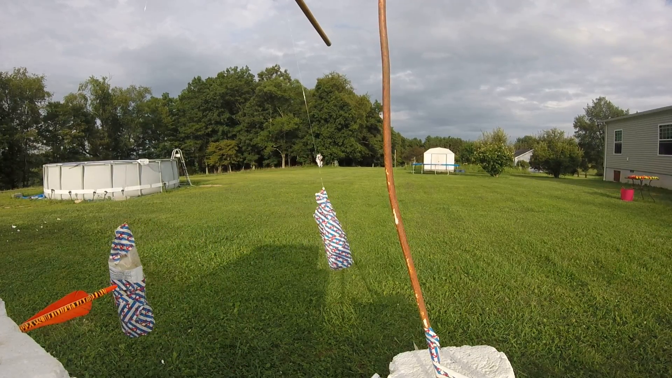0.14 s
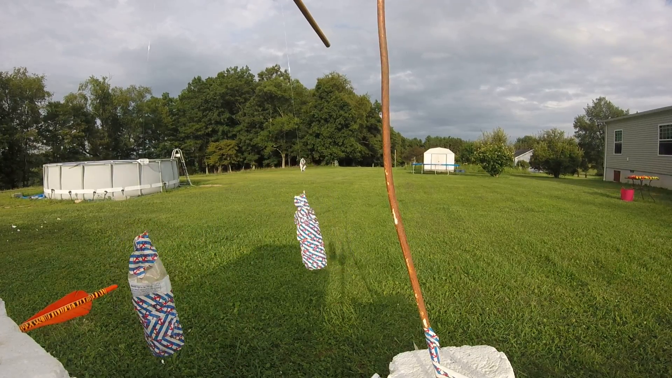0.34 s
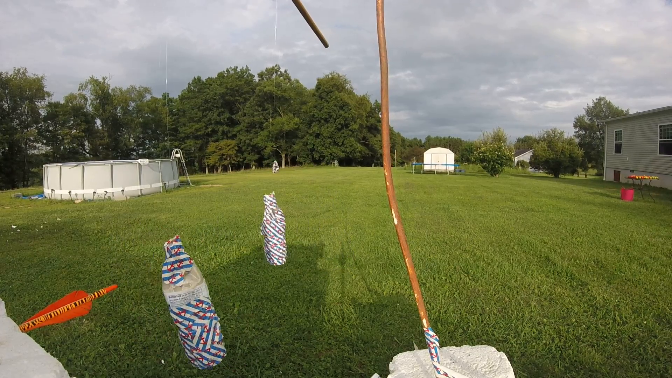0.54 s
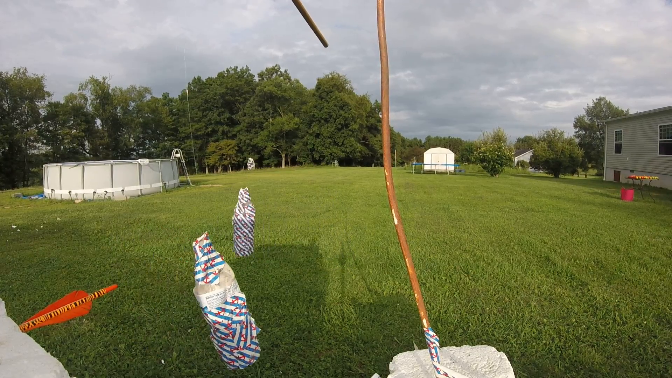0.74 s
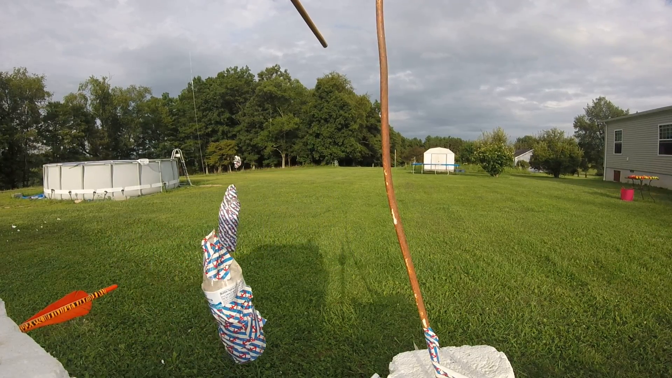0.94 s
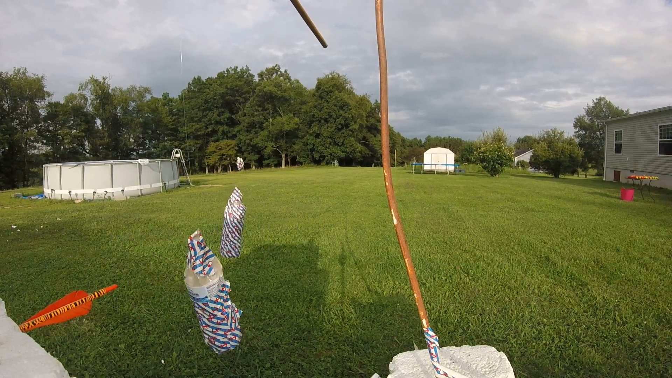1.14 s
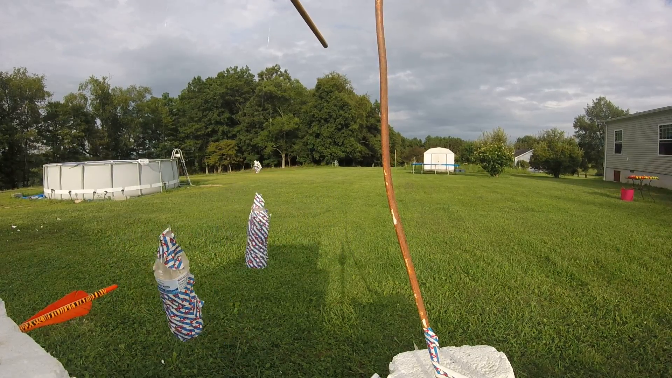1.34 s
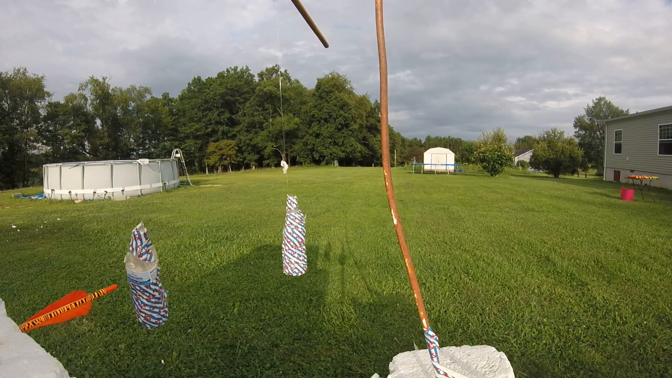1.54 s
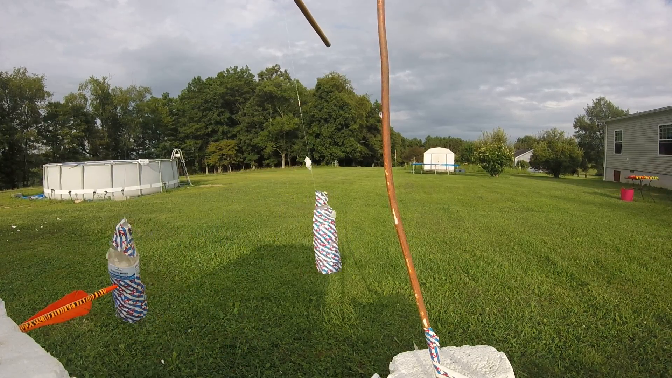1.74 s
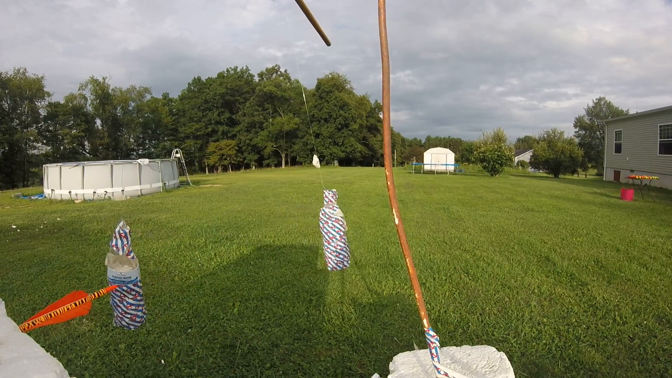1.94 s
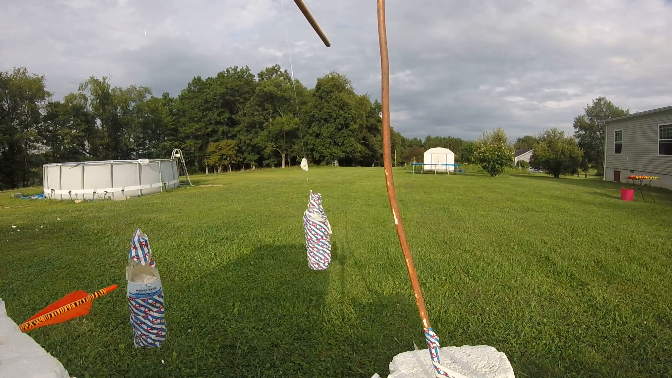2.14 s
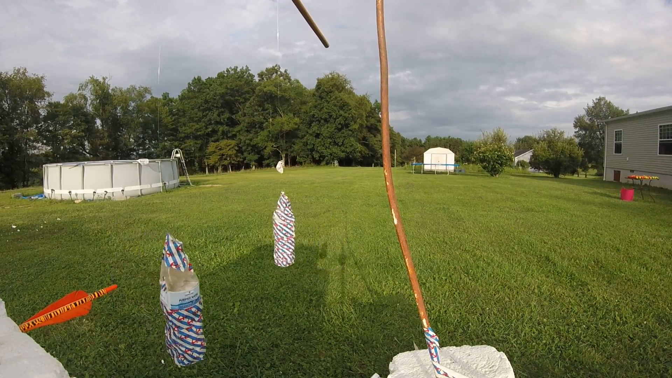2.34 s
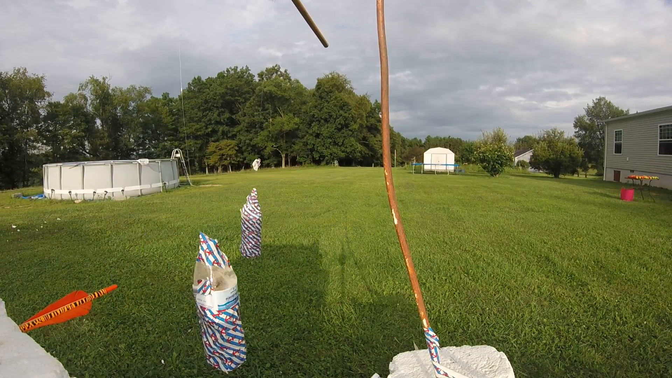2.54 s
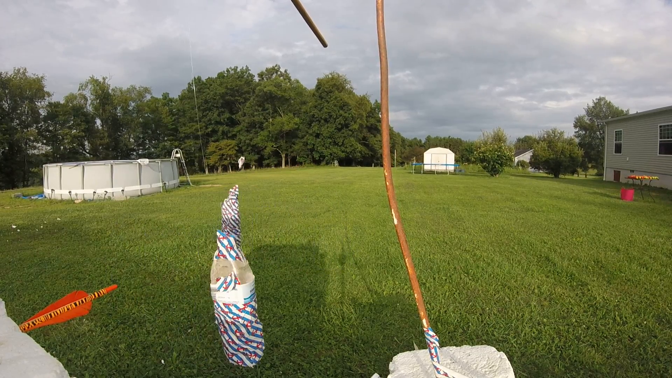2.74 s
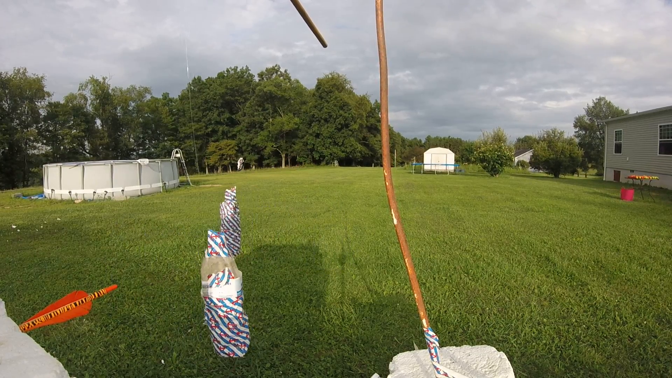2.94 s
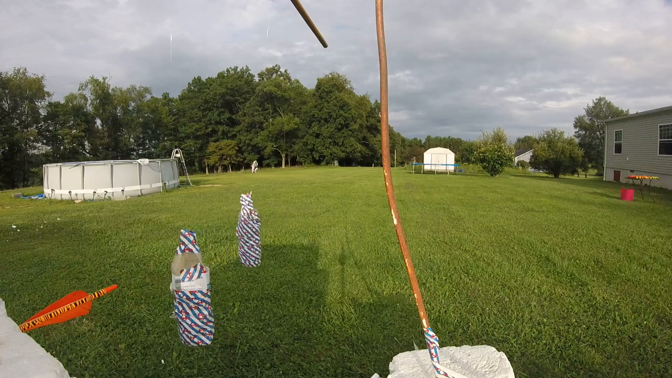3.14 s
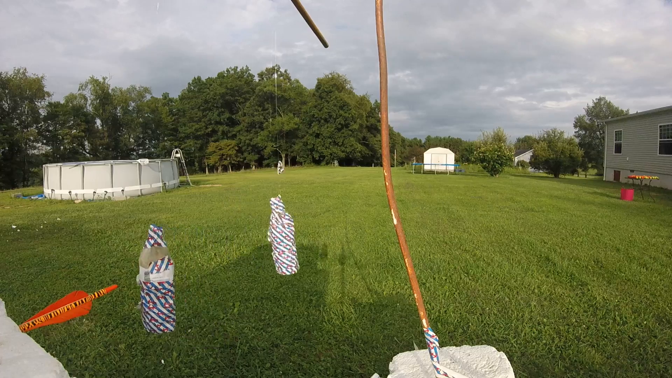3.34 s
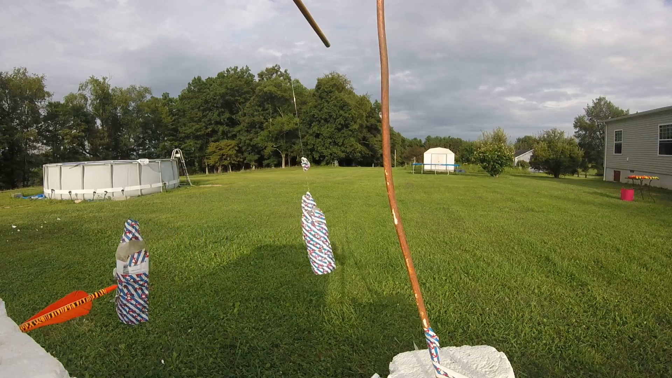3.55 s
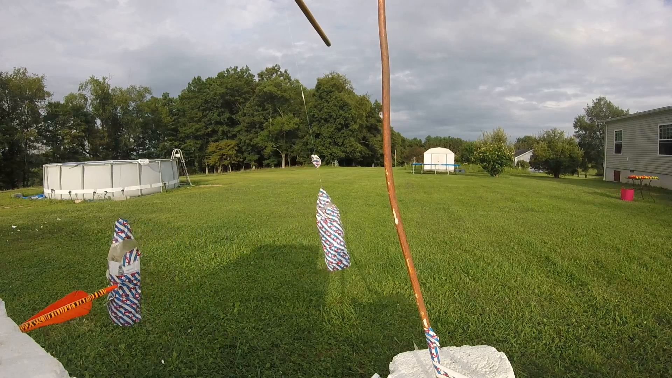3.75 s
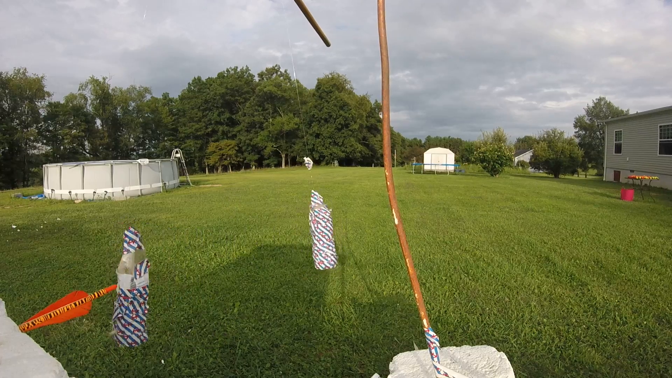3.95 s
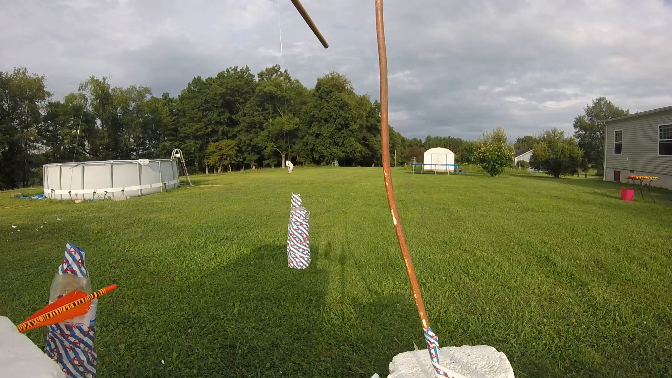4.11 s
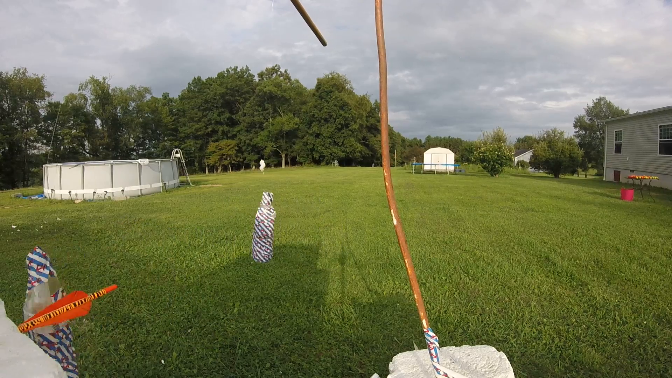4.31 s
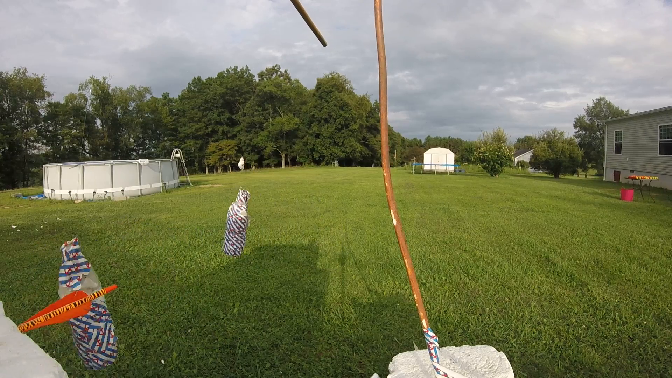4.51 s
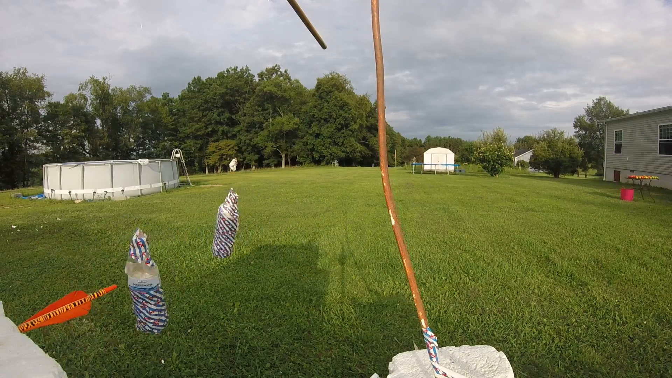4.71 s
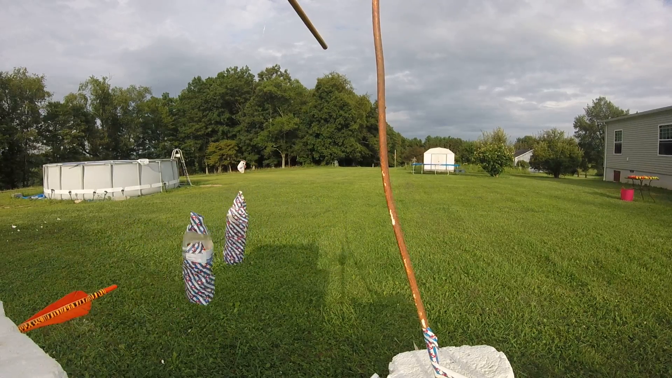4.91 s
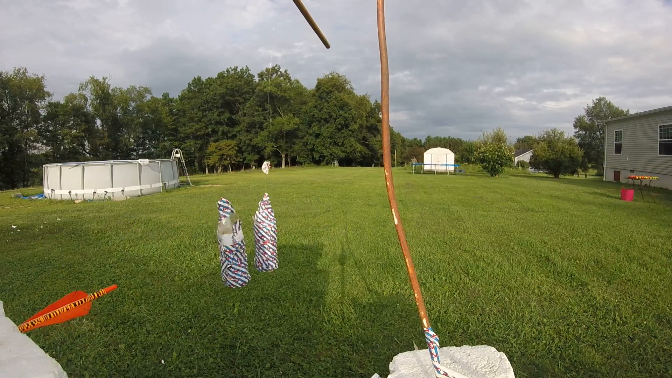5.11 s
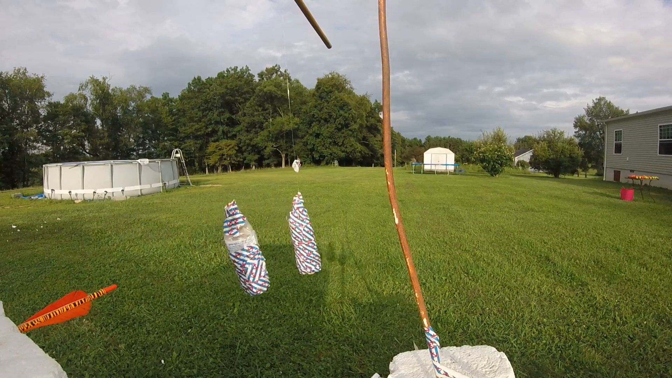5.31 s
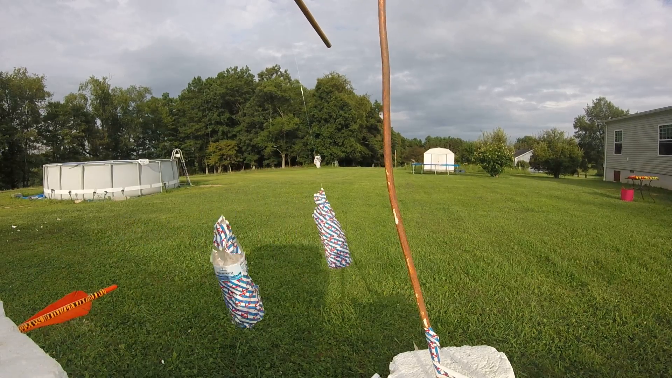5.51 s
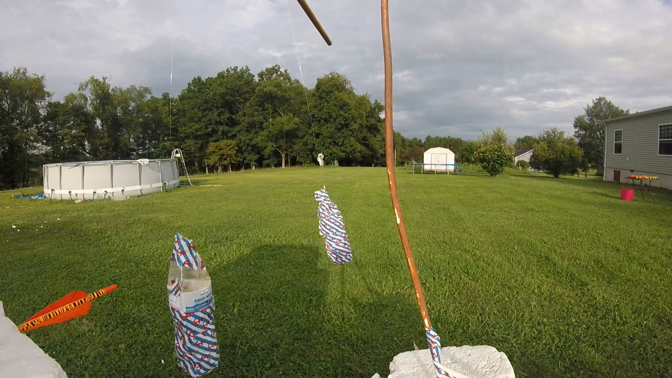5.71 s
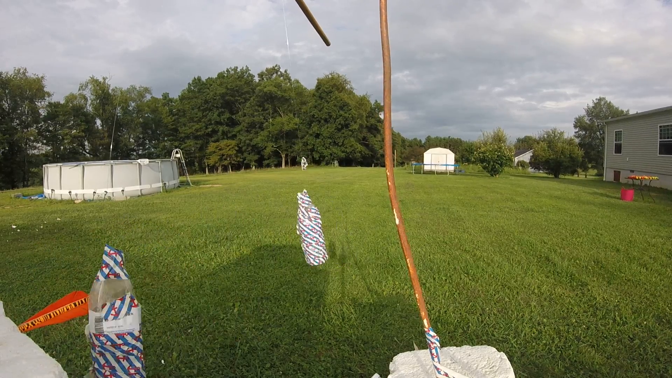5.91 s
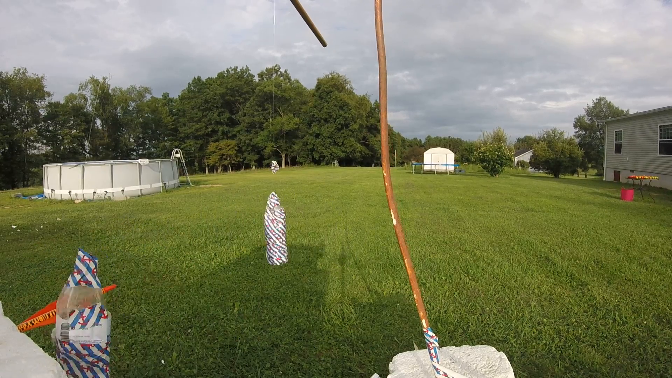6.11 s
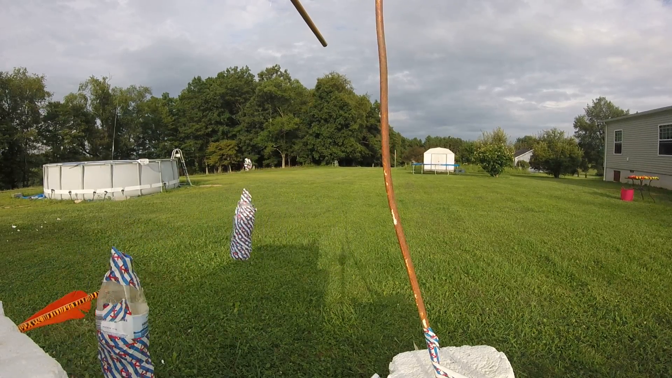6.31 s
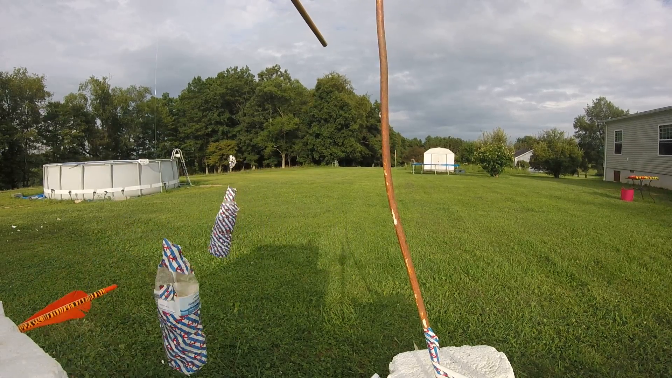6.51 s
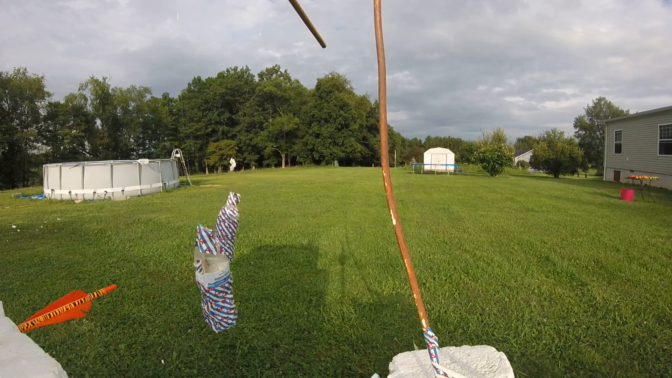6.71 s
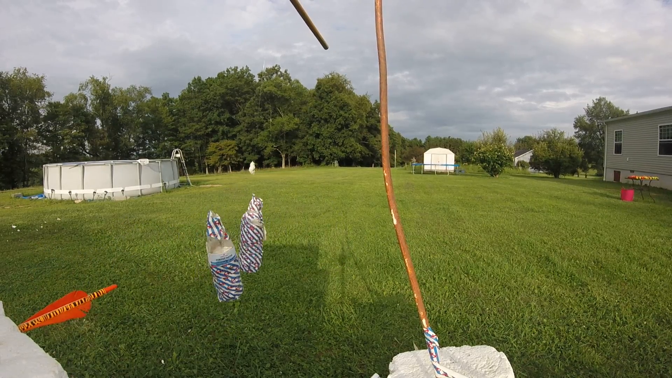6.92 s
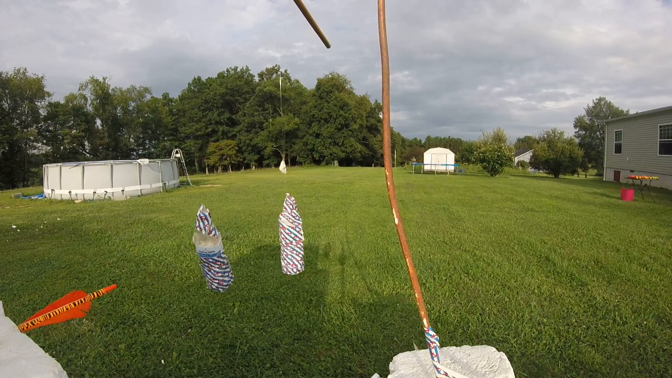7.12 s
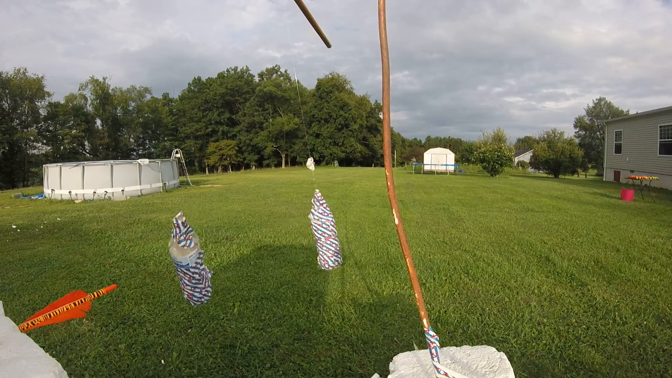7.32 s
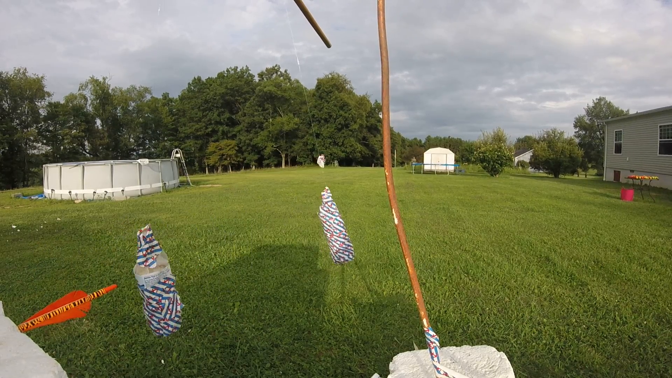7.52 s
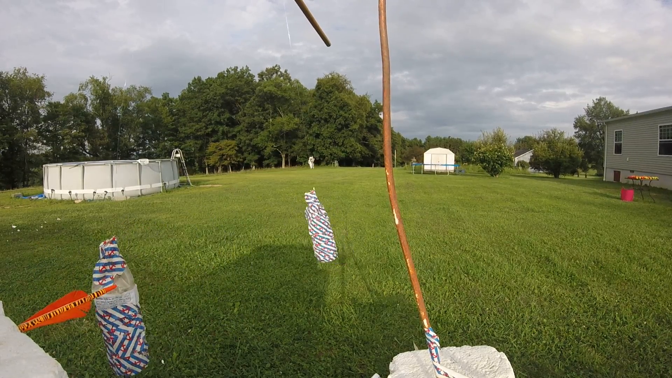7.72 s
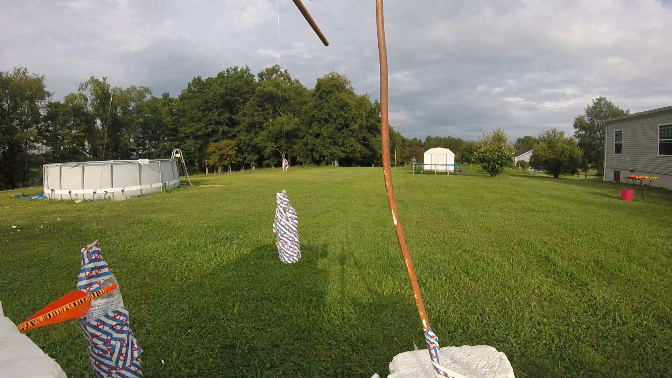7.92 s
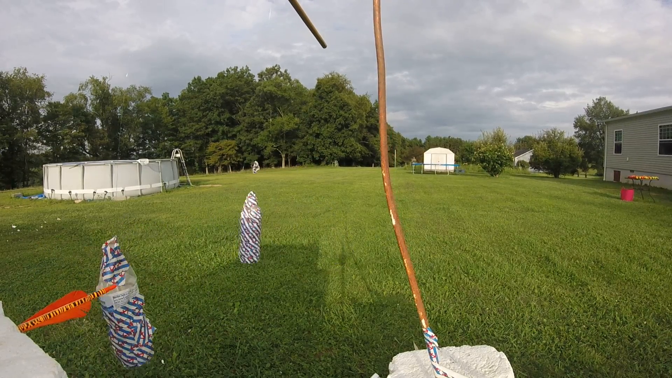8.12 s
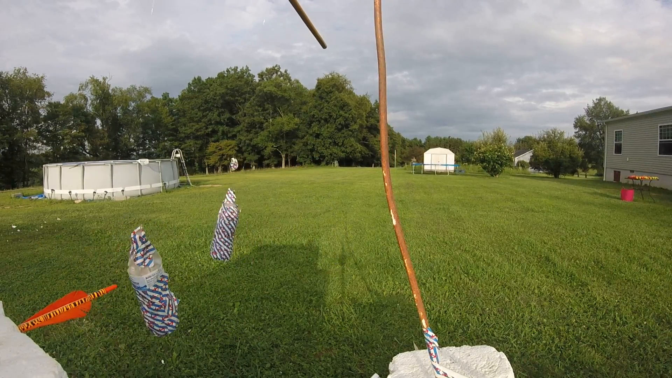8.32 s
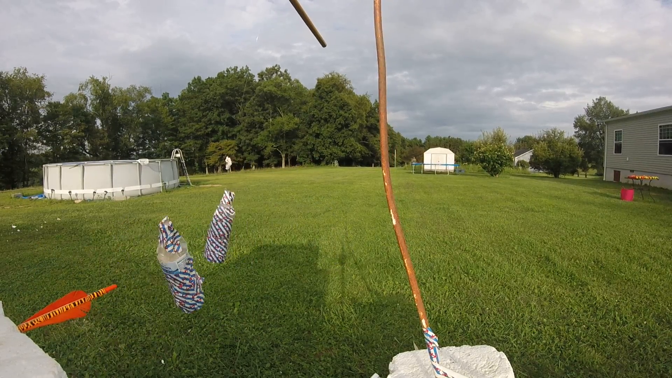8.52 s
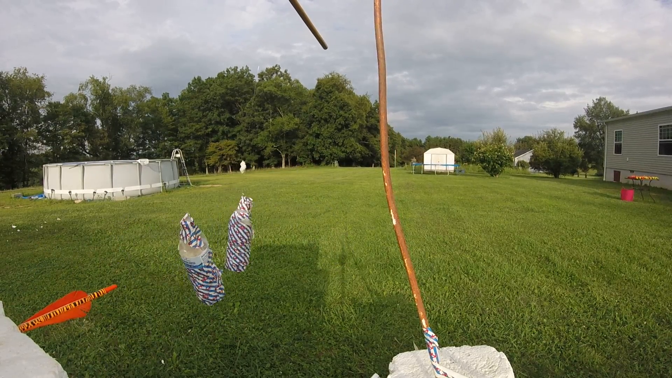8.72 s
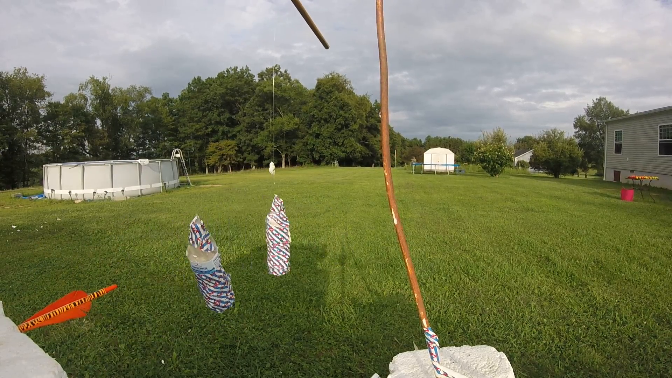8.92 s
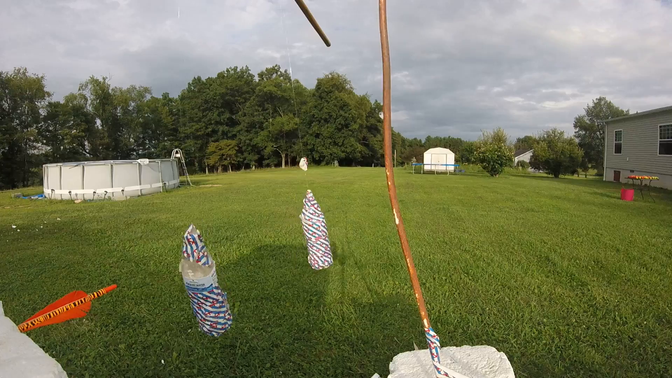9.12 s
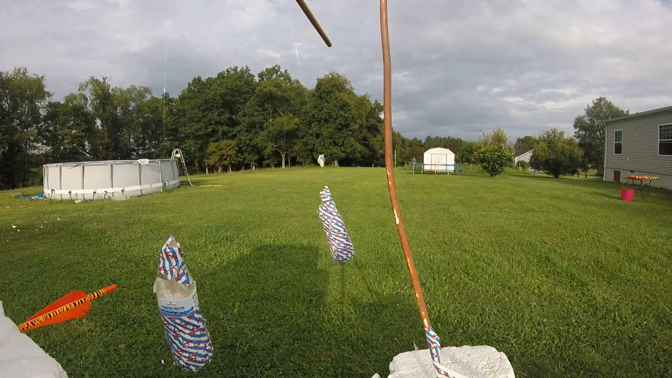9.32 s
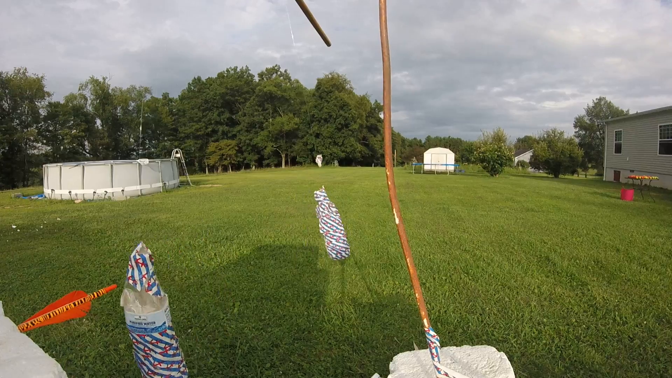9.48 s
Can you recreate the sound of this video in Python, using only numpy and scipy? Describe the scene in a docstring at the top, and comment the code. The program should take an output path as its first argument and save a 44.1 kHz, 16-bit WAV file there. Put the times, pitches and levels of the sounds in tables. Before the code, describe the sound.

An arrow cracks into a nearby target and rattles, then swinging bottles knock against its shaft over faint insects and a distant engine.

```python
"""An arrow strikes a back-yard target.

A far bow slaps, feathers hiss closer, and the arrow cracks into a target beside the microphone,
exciting its damped modes. The shaft rattles; later, bottles swinging on strings brush and knock it.
House and trees reflect each blow. Insects chirp, a distant engine drones and light wind buffets."""
import sys
import numpy as np
from scipy import signal
from scipy.fft import rfft, irfft, next_fast_len
from scipy.io import wavfile
from scipy.ndimage import minimum_filter1d, map_coordinates

SR = 44100
rng = np.random.default_rng(int(sys.argv[2]) if len(sys.argv) > 2 else 0)


def unload_audio(sound):
    """Save the sound as a 16-bit wav file, at the path given as the first command line argument."""
    columns = np.transpose(np.atleast_2d(sound))
    # keep every value between -1 and 1, then stretch to whole-number steps
    steps = np.round(np.clip(columns, -1, 1) * 32767)
    wavfile.write(sys.argv[1], SR, steps.astype(np.int16))


N = 421155


def amp(db):
    """The decibel scale: 20 dB is a tenfold amplitude."""
    return 10 ** (np.asarray(db) / 20)


def unit(x):
    """Normalisation to rms 1."""
    return x / np.sqrt(np.mean(x ** 2) + 1e-20)


def along(spectrum, hz):
    """Interpolation of a spectrum on a logarithmic frequency axis."""
    knots_hz, level_db = np.transpose(spectrum)
    return np.interp(np.log(hz + 1), np.log(knots_hz + 1), level_db)


def curves(rows):
    """Linear interpolation in time: one curve for each column after the first."""
    times, *columns = np.transpose(rows)
    return [np.interp(np.arange(N) / SR, times, column) for column in columns]


def wobble(rate_hz):
    """Random modulation: a smooth curve through Gaussian knots."""
    knots = rng.standard_normal(int(N * rate_hz / SR) + 4)
    return map_coordinates(knots, [np.arange(N) * rate_hz / SR])


def noise(spectrum, size=N):
    """Spectral shaping of white noise, at rms 1."""
    padded = next_fast_len(size + 8192)
    gain = amp(along(spectrum, np.fft.rfftfreq(padded, 1 / SR)))
    return unit(irfft(rfft(rng.standard_normal(padded)) * gain, padded)[:size])


def envelope(start, end, rise_db_per_s, fall_db_per_s, size=N):
    """Exponential growth until start, a hold at 1, and exponential decay after end."""
    t = np.arange(size) / SR
    return amp(-rise_db_per_s * np.maximum(start - t, 0) - fall_db_per_s * np.maximum(t - end, 0))


def minimum_phase(gain_db):
    """Folding the cepstrum gives the promptest impulse response with this spectrum."""
    cepstrum = irfft(np.log(amp(gain_db)))
    half = len(cepstrum) // 2
    cepstrum[1:half] *= 2
    cepstrum[half + 1:] = 0
    return irfft(np.exp(rfft(cepstrum)))


def add(track, start_s, sound):
    """Superposition of a sound on the track."""
    span = track[max(round(start_s * SR), 0):][:len(sound)]
    span += sound[:len(span)]


# Puffs of wind: peak_s, half_length_s, level_db
WIND_PUFFS = [(1.83, .1, -46), (2.9, 1.3, -56), (4.903, .08, -47), (7.033, 0.071, -37.5),
              (7.319, 0.17, -36.5), (7.792, 0.074, -38), (8.253, 0.49, -47.5), (8.998, 0.053, -42),
              (9.41, 0.094, -41)]
# Spectra of the buffeting and of the outdoor hush: frequency_hz, density_db
BUFFET_SPECTRUM = [(12, -35), (32, 1.5), (90, 0), (140, -5), (220, -16.5), (400, -32.5), (1200, -68.5)]
HUSH_SPECTRUM = [(12, -16), (22, -5.5), (110, -2.5), (180, -8), (230, -14), (450, -17.5), (760, -16.5),
                 (1020, -22), (1500, -25.5), (2300, -26.5), (2800, -31), (4000, -33.5), (5500, -33.5),
                 (7000, -34), (8000, -42), (11000, -48.5), (15500, -56)]

def wind(calm_db=-61, hush_db=-49.5):
    """Turbulent pressure buffets the microphone in bell-shaped puffs over a steady hush."""
    t = np.arange(N) / SR
    puffs = sum(amp(db) * np.exp(-((t - peak) / half) ** 2) for peak, half, db in WIND_PUFFS)
    buffet = (amp(calm_db) + puffs) * amp(2.0 * wobble(22)) * noise(BUFFET_SPECTRUM)
    hush = amp(hush_db + 0.22 * wobble(4.1)) * noise(HUSH_SPECTRUM)
    return buffet + hush


# Exhaust partials: firing_multiple, level_db
ENGINE_ORDERS = [(1, 3.5), (1.4, -13), (2, -20.5), (2.4, -16.5), (3, -23), (5, -31), (6, -36)]

def drone(spell, overtones_db, drift_hz=0.4, fade_db_per_s=216):
    """Periodic firing gives harmonics; uneven firing adds orders between the whole ones."""
    firing_hz, level_db = curves(spell)
    phase = 2 * np.pi * np.cumsum(firing_hz + drift_hz * wobble(10)) / SR
    tone = np.zeros(N)
    for order, db in ENGINE_ORDERS:
        waver_db = np.sqrt(order) * wobble(40)
        tone += amp(db + overtones_db * (order > 1) + waver_db) * np.sin(order * phase)
    fade = envelope(spell[0][0], spell[-1][0], fade_db_per_s, fade_db_per_s)
    return amp(level_db) * fade * unit(tone)


# Spells of droning (LATE_SPELLS holds two): time_s, firing_hz, level_db
OPENING_SPELL = [(0, 126.2, -38.5), (.09, 124.8, -42)]
EASING_SPELL = [(0.38, 123.0, -38.5), (0.45, 122.8, -39.5), (0.886, 121.0, -37.5), (1.418, 118.9, -32),
                (1.534, 118.4, -34.5), (1.806, 116, -31.5), (1.912, 113.5, -38), (2.08, 109.8, -38.5),
                (2.1, 109.6, -46)]
LATE_SPELLS = [
    [(2.7, 159.3, -48.5), (3.274, 143.1, -59), (3.368, 155.5, -55.5), (4.0, 153.0, -52)],
    [(8.0, 117.4, -39.5), (8.25, 119.8, -38.5), (8.876, 141.1, -47.5), (9.55, 144.8, -52)],
]
# Course of the exhaust roar: time_s, level_db
ROAR_COURSE = [(0, -44), (.35, -42), (1.5, -42), (3, -53.5), (3.8, -52.5), (4.4, -63.5), (7.8, -60),
               (8.1, -51), (9.55, -56)]
# Spectrum of the roar: frequency_hz, density_db
ROAR_SPECTRUM = [(30, -3.5), (80, -7), (160, 1.5), (210, -7), (300, -7), (430, -21.5), (680, -12.5),
                 (1000, -29.5), (2200, -31), (5000, -66)]

def engine():
    """Tonal plus broadband exhaust noise: a far engine eases off, then picks up again, duller."""
    early = sum(drone(spell, overtones_db=0.5) for spell in [OPENING_SPELL, EASING_SPELL])
    late = sum(drone(spell, overtones_db=-7.5) for spell in LATE_SPELLS)
    roar_db, = curves(ROAR_COURSE)
    roar = amp(roar_db + 1.3 * wobble(7.4)) * noise(ROAR_SPECTRUM)
    return early + late + roar


# Insect songs: start_s, end_s, chirp_rate_hz, top_hz, end_hz, level_db
INSECT_SONGS = [(0, 2.38, 15, 7020, 6600, -70), (2.42, 3.6, 13.3, 6800, 6450, -76),
                (3.62, 7.6, 13.7, 6970, 6566, -70), (7.4, 7.2, 10, 6450, 6100, -73.5),
                (8.3, 9.55, 15, 6900, 6580, -74), (0, 8.45, 16, 6373, 6237, -75.5)]

def insects(duty=0.61, crest=0.095, rasp=0.34, scatter_db=1.5):
    """Stridulation: each wing stroke is a raspy chirp whose pitch crests early, then falls."""
    t, out = np.arange(N) / SR, np.zeros(N)
    for start, end, rate_hz, top_hz, end_hz, db in INSECT_SONGS:
        cycles = (t - start) * rate_hz + 0.057 * wobble(1.8)
        stroke = np.minimum(cycles % 1 / duty, 1)
        fall = ((stroke - crest) / (1 - crest)) ** 2
        pitch_hz = top_hz + (end_hz - top_hz) * (fall + rasp * wobble(900))
        tone = unit(np.sin(2 * np.pi * np.cumsum(pitch_hz) / SR))
        swell = unit(np.sqrt(np.abs(np.sin(np.pi * stroke)))) * (t > start) * (t < end)
        out += amp(db + scatter_db * wobble(17)) * swell * tone
    return out


# Reflections from lawn, house wall and trees: delay_s, relative_db, fall_db_per_s
REFLECTIONS = [(0.0046, 17.5, 400), (.078, 3, 350), (0.027, 7.5, 52.5)]
# Spectrum of the reflections: frequency_hz, density_db
ECHO_SPECTRUM = [(80, -19.5), (300, 2), (800, -8.5), (1400, -10.5), (2200, 1.5), (4000, -4.5), (6800, -1),
                 (10000, -2), (15000, -3.5)]

def yard_echo(source, echo_db, lumps_db=4.0, size=30000):
    """Diffuse reflection: convolution with a noise tail that swells at each surface's delay."""
    fade = sum(amp(db) * envelope(delay, delay, rise_db_per_s=601, fall_db_per_s=fall, size=size)
               for delay, db, fall in REFLECTIONS)
    tail = noise(ECHO_SPECTRUM, size) * fade * amp(lumps_db * wobble(90))[:size]
    return amp(echo_db) * signal.fftconvolve(source, tail / np.linalg.norm(tail))[:N]


def flight(peak_s=4.05, level_db=-59):
    """Aerodynamic noise: the hiss of the feathers grows as the arrow nears."""
    hiss = noise([(300, -7.0), (2000, 11), (3000, -8), (8000, -11.5), (9800, -9.0), (14000, -25)])
    return amp(level_db) * envelope(peak_s, peak_s, rise_db_per_s=55, fall_db_per_s=107) * hiss


# Spectrum of the bow's slap: frequency_hz, density_db
BOW_SPECTRUM = [(200, -7), (700, 5), (1300, -13), (2100, 4), (2700, -11.5), (3900, -12), (7000, -20),
                (14000, -44)]

def bow(release_s=3.618, level_db=-48.5):
    """A broadband transient: the far bow slaps as it is loosed."""
    slap = envelope(release_s, release_s, rise_db_per_s=5000, fall_db_per_s=150)
    return amp(level_db) * slap * noise(BOW_SPECTRUM)


# Shaft and strings rub after a blow: start_s, end_s, level_db
RUB_SPANS = [(4.145, 4.155, -41), (4.29, 4.31, -48), (4.355, 4.442, -49.5), (6.178, 6.183, -52),
             (6.253, 6.428, -57.5)]
# Spectrum of the scrape: frequency_hz, density_db
RUB_SPECTRUM = [(150, 5), (450, 11), (800, 7.5), (1500, -1.5), (2250, 2), (2700, -11.5), (3400, -4.5),
                (4300, -7), (6800, -3.5), (9000, -17), (15000, -31)]

def rubbing(grain=0.46):
    """Friction noise: many tiny slips merge into a faint, grainy scrape."""
    rubs = [amp(db) * envelope(start, end, rise_db_per_s=1500, fall_db_per_s=125)
            for start, end, db in RUB_SPANS]
    scrape = unit((1 + grain * wobble(350)) * noise(RUB_SPECTRUM))
    return np.max(rubs, axis=0) * scrape


def snap(spectrum, tilt_db_per_octave, ping_hz, crunch, crunch_t60_s, ping_db=6, size=2048):
    """Source and filter: an impulse and a short crunch, coloured by the contact's favoured resonance."""
    t, hz = np.arange(size) / SR, np.fft.rfftfreq(size, 1 / SR)
    force = crunch * rng.standard_normal(size) * amp(-60 * t / crunch_t60_s)
    force[0] = 1
    octaves = np.log2(np.maximum(hz, 500) / 500)
    ping = np.exp(-(np.log2((hz + 1) / ping_hz) / 0.27) ** 2)
    response = minimum_phase(along(spectrum, hz) + tilt_db_per_octave * octaves + ping_db * ping)
    click = signal.fftconvolve(force, response)[:size]
    return -click / np.linalg.norm(click) * np.sqrt(0.002 * SR)  # the energy of 2 ms at rms 1


# Modes of the target and its stand: pitch_hz, level_db, t60_s
TARGET_MODES = [(55, -14, 0.12), (169.5, -2.5, 0.07), (337, -5.5, 0.063), (387, -9, 0.095),
                (435.6, -7, 0.069), (555, 0.5, 0.041), (670, -2.5, 0.05), (765, -13, 0.076),
                (960, -5, 0.03), (1444, -9, 0.042), (1810, -12, .03), (2140, -2.5, 0.027)]

def thud(corner_hz, attack_s=0.002, scatter_db=5.0):
    """Modal ringing of the target: a soft push mainly excites the modes below its corner frequency."""
    t = np.arange(SR // 3) / SR
    hz, db, t60_s = np.transpose(TARGET_MODES)[:, :, None]
    strength = amp(db + scatter_db * rng.standard_normal(hz.shape)) / np.sqrt(1 + (hz / corner_hz) ** 4)
    signs = (-1) ** np.arange(len(hz))[:, None]  # neighbouring modes swing opposite ways
    modes = signs * strength * amp(-60 * t / t60_s) * np.sin(2 * np.pi * hz * t)
    return modes.sum(axis=0) * (1 - np.exp(-t / attack_s))


def blows(contacts, spectrum, crunch, crunch_t60_s, travel_s=0.0028):
    """Structure-borne sound: each contact snaps, then travels down the shaft to thud in the target."""
    out = np.zeros(N)
    for start, snap_db, tilt, ping_hz, thud_db in contacts:
        add(out, start, amp(snap_db) * snap(spectrum, tilt, ping_hz, crunch, crunch_t60_s))
        corner_hz = 900 * 2 ** (0.2 * tilt)  # a harder, brighter contact reaches higher modes
        add(out, start + travel_s, amp(thud_db) * thud(corner_hz))
    return out


# Bottles meet the shaft: start_s, snap_db, tilt_db_per_octave, ping_hz, thud_db
BOTTLE_KNOCKS = [(6.1775, -38.5, -9.5, 742, -25.5), (6.1847, -42, 6, 3340, -39),
                 (6.1915, -37.5, 1.5, 1305, -42), (6.3641, -38, -3.5, 962, -44),
                 (6.4265, -47.5, 0.5, 3525, -51), (7.9445, -16.5, .3, 2020, -25.5),
                 (7.9637, -39, 3, 3360, -39), (8.0506, -32, -1, 2300, -52),
                 (8.0545, -16.5, -1.5, 1480, -41), (8.0590, -26.5, 5, 1800, -45),
                 (8.0616, -20.5, 1, 3400, -27), (8.0950, -20, 4.5, 5000, -30),
                 (8.1289, -31, 1.5, 5000, -41), (8.1674, -41.5, -6, 1400, -47)]
# Spectrum of a bottle's snap: frequency_hz, density_db
CLACK_SPECTRUM = [(80, -21), (330, -18.5), (730, -3), (980, -10.5), (1900, -7.5), (2280, -8.5),
                  (2700, -33.5), (3200, -10.5), (4200, -23), (4900, -17.5), (6200, -23.5), (7100, -15),
                  (8200, -35.5), (9600, -30.5), (16000, -56)]

def bottles(rebound_s=0.0043, rebound_db=-13):
    """Inelastic collision: each knock of a swinging bottle is followed by a weaker rebound."""
    rebounds = [(start + rebound_s, snap_db + rebound_db, tilt, ping_hz, thud_db + rebound_db)
                for start, snap_db, tilt, ping_hz, thud_db in BOTTLE_KNOCKS]
    return blows(BOTTLE_KNOCKS + rebounds, CLACK_SPECTRUM, crunch=0.18, crunch_t60_s=0.0092)


# Contacts of the stuck shaft: start_s, snap_db, tilt_db_per_octave, ping_hz, thud_db
SHAFT_RATTLES = [(4.1807, -35, -3.5, 2200, -29), (4.3000, -35.5, -3, 2000, -47),
                 (4.3400, -44, 3, 6960, -62), (4.3508, -35.5, 1, 6000, -40), (4.3917, -42, 3, 700, -37.5),
                 (4.4277, -48, -1, 3500, -59), (4.4430, -37.5, -4.5, 900, -49), (4.4650, -54, 4, 7540, -75),
                 (4.8063, -55, 12, 10000, -74)]
# Spectrum of the arrow's snap, in rattle and strike alike: frequency_hz, density_db
CRACK_SPECTRUM = [(80, -34.5), (350, -4), (730, -4.5), (1150, -12.5), (1620, -8.5), (2150, -2), (2350, -11),
                  (2680, -26), (3300, -8.5), (4500, -22.5), (5400, -15), (8300, -28), (10800, -37),
                  (12500, -43), (16000, -53.5)]

def rattle():
    """Intermittent contact: the stuck shaft clicks against the target."""
    return blows(SHAFT_RATTLES, CRACK_SPECTRUM, crunch=0.32, crunch_t60_s=0.011)


def strike(start_s=4.1270, jolt_gap_s=0.0091, tear_lead_s=0.0009, stop_s=4.1507):
    """Momentum transfer: the arrow enters in three jolts, the snaps fading as the thuds grow."""
    out = np.zeros(N)
    texture = dict(crunch=0.28, crunch_t60_s=0.016)
    for jolt in range(3):
        jolt_s = start_s + jolt * jolt_gap_s
        snap_db = -4 - 3.5 * jolt ** 1.9
        tear = snap(CRACK_SPECTRUM, tilt_db_per_octave=8, ping_hz=10500, **texture)
        crack = snap(CRACK_SPECTRUM, tilt_db_per_octave=-0.5 - 2 * jolt, ping_hz=704, **texture)
        add(out, jolt_s - tear_lead_s, amp(snap_db - 16) * tear)  # the point tears the target's skin
        add(out, jolt_s, amp(snap_db) * crack)
        add(out, jolt_s, amp(-23.5 + 5 * jolt) * thud(corner_hz=880 * 0.8 ** jolt))
    add(out, stop_s, amp(-5) * thud(corner_hz=543))  # the whole target takes the arrow's weight
    return out


def scene():
    """Superposition of the near blows, their echoes and the sounds of the yard, in mono."""
    arrow = strike() + rattle() + rubbing()
    knocks = bottles()
    echoes = yard_echo(arrow, echo_db=-22) + yard_echo(knocks, echo_db=-23.5)
    return (arrow + knocks + echoes + flight() + bow() + insects() + engine() + wind())[None]


def gain_control(x, threshold_db=-12, slope=0.22, hold_s=0.525, ease_s=0.05):
    """Compression: a loud peak turns the gain down a little; it recovers after a hold."""
    over_db = np.maximum(20 * np.log10(np.abs(x) + 1e-9) - threshold_db, 0)
    span = 2 * round(hold_s * SR / 2) + 1
    held_db = minimum_filter1d(-slope * over_db, span, origin=span // 2)
    ease = 1 / (ease_s * SR)
    return x * amp(signal.lfilter([ease], [1, ease - 1], held_db))


def record(dry, ceiling=1.05, top_hz=15300):
    """Saturation flattens the loudest compressed peak; a band limit removes the highest treble."""
    compressed = gain_control(dry)
    clipped = compressed / (1 + np.abs(compressed / ceiling) ** 10) ** (1 / 10)
    padded = next_fast_len(N + SR)
    passband = np.fft.rfftfreq(padded, 1 / SR) < top_hz
    return irfft(rfft(clipped, padded) * passband, padded)[..., :N]


dry = scene()
out = record(dry)
unload_audio(out)
```